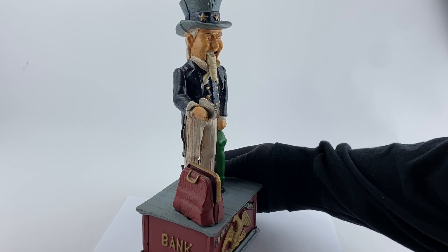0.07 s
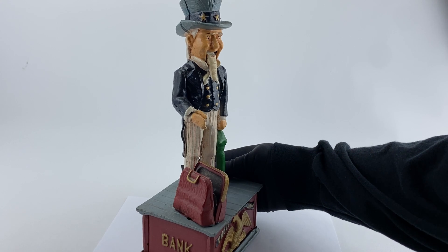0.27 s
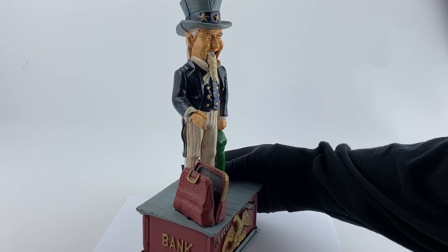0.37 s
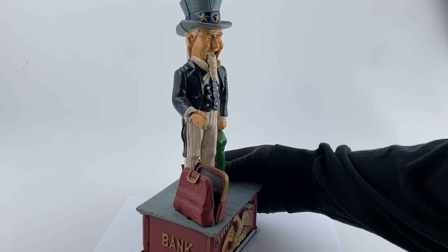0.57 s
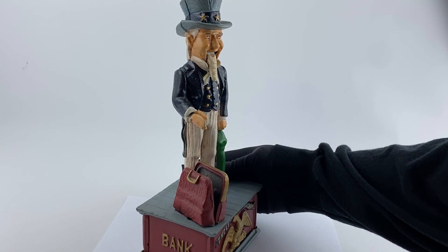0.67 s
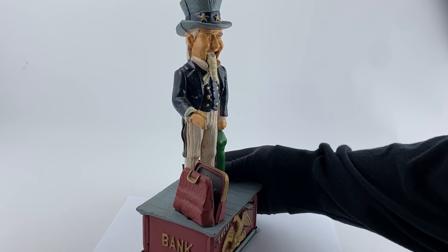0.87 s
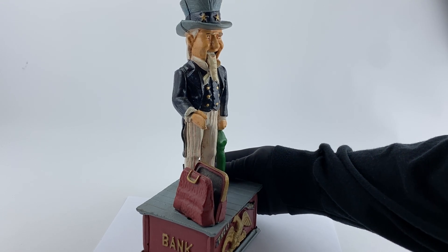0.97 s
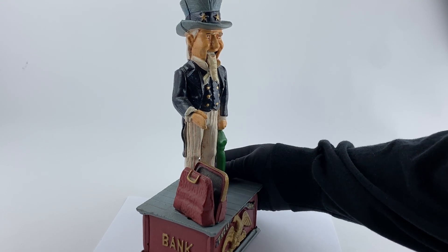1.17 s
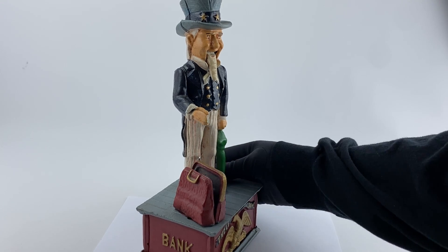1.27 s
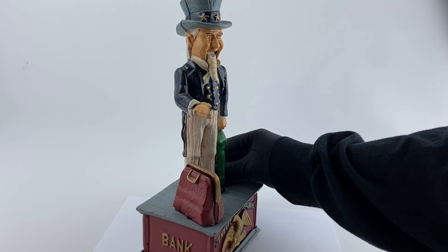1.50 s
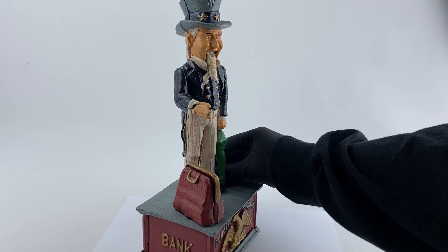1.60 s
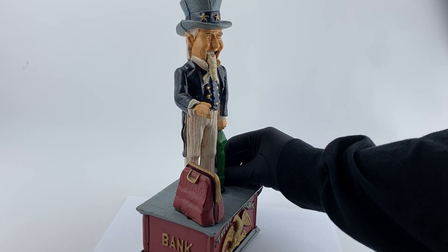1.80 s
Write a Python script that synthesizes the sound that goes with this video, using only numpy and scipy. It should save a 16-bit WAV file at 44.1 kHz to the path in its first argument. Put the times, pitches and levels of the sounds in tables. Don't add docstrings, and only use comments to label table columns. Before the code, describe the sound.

Close stereo sound of an iron coin bank in a quiet, slightly echoing room: scraping lever clatter with a low table boom, bright coin clinks, two hard knocks inside, faint settling, then a duller returning rattle.

```python
import sys
import numpy as np
from scipy import signal
from scipy.fft import rfft, irfft, next_fast_len
from scipy.io import wavfile
from scipy.ndimage import uniform_filter1d, map_coordinates

SR = 44100
rng = np.random.default_rng(int(sys.argv[2]) if len(sys.argv) > 2 else 0)


def generate_wav(signal):
    frames = np.transpose(np.atleast_2d(signal))
    scaled = np.clip(frames, -1, 1) * 32767
    pcm = np.round(scaled).astype(np.int16)
    wavfile.write(sys.argv[1], SR, pcm)


def gain_from_decibels(decibels):
    exponent = np.asarray(decibels, float) / 20
    return 10 ** exponent


N = 81585


def along(points, hz):
    f, v = np.transpose(points)
    return np.interp(np.log(hz + 1), np.log(f + 1), v)


def filtered(x, response):
    n = x.shape[-1]
    m = next_fast_len(n + 8192)
    return irfft(rfft(x, m) * response(np.fft.rfftfreq(m, 1 / SR)), m)[..., :n]


def causal(gain_db):
    cepstrum = irfft(gain_db * np.log(10) / 20)
    half = len(cepstrum) // 2
    folded = np.concatenate([cepstrum[:1], 2 * cepstrum[1:half], np.zeros(len(cepstrum) - half)])
    return np.exp(rfft(folded))


def pair(x, alike):
    def mix(hz):
        turn = np.arccos(np.clip(along(alike, hz), -1, 1)) / 2
        return np.array([np.cos(turn), np.sin(turn)])
    mid, side = filtered(x, mix)
    return np.array([mid + side, mid - side])


def add(out, x, s):
    i = round(s * SR)
    out[..., i:i + x.shape[-1]] += x[..., :out.shape[-1] - i]


def wobble(rate_hz, size):
    return map_coordinates(rng.standard_normal(100), [np.arange(size) * rate_hz / SR])


# (frequency [Hz], level [dB per Hz])
AIR = [(25, -53), (45, -4.5), (90, -10), (150, -10.5), (555, -20.5), (800, -26), (3010, -38.5),
       (15000, -79)]
# (frequency [Hz], likeness [-1 to 1])
AIR_ALIKE = [(60, 0.8), (200, 0.89), (700, 0.06), (2500, 0.09), (7000, 0.2), (9000, 0.92)]
# (frequency [Hz], level [dB])
HUMS = [(56, -48.5), (118, -51.5)]


def air():
    air_db, sway_db = -49, 2.5
    hiss = filtered(pair(rng.standard_normal((2, N)), AIR_ALIKE), lambda hz: gain_from_decibels(along(AIR, hz)))
    hum = np.zeros(N)
    for hz, db in HUMS:
        level = gain_from_decibels(db + sway_db * wobble(19, N))
        cycles = hz * np.arange(N) / SR + 0.33 * wobble(3.5, N)
        hum += level * np.sin(2 * np.pi * cycles)
    return gain_from_decibels(air_db) * hiss / np.sqrt(np.mean(hiss ** 2)) + hum


# (time [s], level [dB], rise [s], swing time [s])
JOLTS = [(0.086, -35, 0.0036, 0.036), (0.212, -7.5, 0.011, 0.05), (0.285, -17, 0.0066, 0.052),
         (0.374, -18, 0.011, 0.027), (0.456, -42.5, 0.012, .05), (.612, -22, 0.0085, 0.039),
         (.665, -35.5, 0.0017, 0.073), (0.817, -38.5, 0.0031, 0.02), (0.874, -37, 0.016, 0.041),
         (1.347, -22.5, 0.011, 0.06), (1.399, -18.5, 0.045, 0.041), (1.444, -19, 0.0062, 0.037),
         (1.479, -23.5, 0.031, 0.034), (1.531, -20.5, 0.019, 0.052), (1.598, -41, 0.0084, 0.075)]
# (frequency [Hz], level [dB], time to fall 60 dB [s])
TABLE_MODES = [(91, -7, 0.069), (243.7, -17.5, 0.26), (419, -21, 0.29), (611, -13, 0.053)]


def table():
    boom_hz, stop_power = 142.9, 1.56
    out, t = np.zeros(N), np.arange(SR // 3) / SR
    for s, db, rise_s, swing_s in JOLTS:
        swell = (1 - np.exp(-t / rise_s)) * np.exp(-(t / swing_s) ** stop_power)
        boom = swell * np.sin(2 * np.pi * boom_hz * t)
        knock = np.zeros(len(t))
        for hz, level, t60 in TABLE_MODES:
            fade = gain_from_decibels(level + rng.normal(0, 1) - 60 * t / t60)
            knock += fade * np.sin(2 * np.pi * hz * rng.normal(1, 0.076) * t)
        add(out, gain_from_decibels(db) * (boom + knock * np.minimum(t / 0.0063, 1)), s)
    return out


# (frequency [Hz], time to fall 60 dB [s])
ROOM = [(150, 0.22), (1000, .4), (3000, 0.33), (8000, 0.32), (15000, 0.12)]
# (frequency [Hz], likeness [-1 to 1])
ROOM_ALIKE = [(150, 0.83), (800, 0.19), (3000, 0.41), (5400, .1), (7800, .995), (8300, 1)]


def room(x):
    room_db, early_db, early_t60_s = -1.5, 10, 0.026
    hz, t, z = signal.stft(rng.standard_normal((2, SR // 3)), SR, nperseg=256)
    late = gain_from_decibels(-60 * t / along(ROOM, hz)[:, None])
    early = gain_from_decibels(early_db - 60 * t / early_t60_s)
    tail = pair(signal.istft(z * (late + early), SR, nperseg=256)[1], ROOM_ALIKE)
    wet = signal.fftconvolve(x[None], tail / np.linalg.norm(tail[0]), axes=1)
    size = wet.shape[1]
    delayed = np.pad(wet, ((0, 0), (40, 0)))[:, :size]
    return np.pad(x, (0, size - len(x))) + gain_from_decibels(room_db) * delayed


def clank(length_s, bright_db, struck_hz, modes, dense, blow_db):
    chatter_t60_s, blow_t60_s, grain_db, mode_scatter_db = 0.015, 0.00017, 4, 2.5
    struck_ring_db, struck_q = 4.5, 13
    struck_db, struck_octaves = 4.5, 0.83
    t = np.arange(8192) / SR
    grains = rng.standard_normal(len(t))
    uneven = gain_from_decibels(grain_db * np.repeat(rng.standard_normal(len(t) // 16), 16))
    chatter = grains * uneven * gain_from_decibels(-60 * np.maximum(t - abs(length_s), 0) / chatter_t60_s)
    drive = chatter + gain_from_decibels(blow_db - 60 * t / blow_t60_s)

    f = np.fft.rfftfreq(2 * len(t), 1 / SR)

    def resonance(hz, width):
        return 1j * f * width / (hz * hz - f * f + 1j * f * width)

    ring = 0
    for k, (hz, width, db) in enumerate(modes):
        ring = ring + (-1) ** k * gain_from_decibels(db + rng.normal(0, mode_scatter_db)) * resonance(hz, width)
    struck = 1 + gain_from_decibels(struck_ring_db) * resonance(struck_hz, struck_hz / struck_q)
    tilt_db = bright_db * np.log2(np.maximum(f, 600) / 3000)
    lift_db = struck_db * np.exp(-(np.log2((f + 1) / struck_hz) / struck_octaves) ** 2)
    body = (ring + causal(along(dense, f))) * struck * causal(tilt_db + lift_db)
    x = irfft(rfft(drive, 2 * len(t)) * body)[:len(t)]
    return x / np.sqrt(np.max(uniform_filter1d(x ** 2, size=128)))


def clanks(contacts, modes, dense, blow_db):
    out = np.zeros((2, N))
    for s, db, *how in contacts:
        add(out, room(gain_from_decibels(db) * clank(*how, modes, dense, blow_db)), s)
    return out


# (time [s], peak level [dB], chatter length [s], brightness [dB per octave],
# pitch of the part struck [Hz])
LEVER = [(.194, -49, 0.01, -8.5, 4740), (.2015, -36, 0.0023, -10, 1110), (.2068, -25, 0.0021, -6, 1050),
         (.2098, -17.5, 0.0015, 1.5, 4370), (.2125, -16.5, 0.0014, 1.5, 1176),
         (.2165, -23.5, 0.0065, -1, 2780), (.2215, -20, 0.0038, 1.5, 635), (.2255, -22, 0.0038, -0.5, 2680),
         (.2305, -26, 0.0026, 4, 4420), (.2345, -17.5, .005, 2, 2450), (.2425, -20.5, 0.0051, -3, 1434),
         (.2465, -17, 0.0016, 5, 3100), (.2505, -19.5, 0.0016, 0.5, 1164), (.2565, -35, 0.0034, -3, 3080),
         (.2635, -22.5, 0.0018, -10.5, 1090), (.273, -41.5, 0.0022, -9.5, 1150),
         (.816, -49, 0.0093, -20, 850), (.823, -53, 0.0025, -18.5, 910), (1.34, -38.5, 0.0046, -1.5, 1105),
         (1.345, -40, 0.0039, -1.5, 4850), (1.351, -28.5, 0.0017, -3, 1050), (1.354, -37, .002, -5, 2130),
         (1.385, -31.5, 0.0017, -7, 925), (1.39, -39, 0.00426, -2.5, 2000), (1.402, -37.5, .002, 4, 11000),
         (1.405, -40, 0.0034, -3.5, 3700), (1.437, -34.5, 0.0035, -6, 2480), (1.445, -32, .004, 0.5, 1800),
         (1.451, -33.5, .004, -2.5, 4040), (1.459, -30, 0.0052, -4, 1424),
         (1.497, -34.5, 0.005, -5.5, 1490), (1.504, -41, 0.0038, -6.5, 2090),
         (1.511, -37.5, 0.0025, -5, 747), (1.531, -42.5, 0.002, -7.5, 883),
         (1.541, -54.5, .004, -15.5, 1377)]
# (frequency [Hz], width [Hz], level [dB])
FIGURE = [(427, 45, 4.5), (635, 12, 4.5), (1050, 160, 5), (1205, 64, 10), (1440, 22, 6), (2050, 58, 9),
          (2605, 56, 3.5), (3193, 260, 8), (3960, 10, -5), (4605, 70, 4.5), (5370, 45, -8),
          (8040, 660, 7.5), (9200, 190, -10), (14500, 270, -11.5)]
# (frequency [Hz], level [dB])
DENSE_FIGURE = [(200, -30.5), (500, -3), (1500, -1), (5000, -1.5), (11000, -3.5), (15500, -4.5)]


def lever():
    return clanks(LEVER, FIGURE, DENSE_FIGURE, blow_db=15.5)


# (time [s], peak level [dB], frequency [Hz], time to fall 60 dB [s])
RODS = [(.211, -25.5, 635, 0.25), (.211, -27.5, 414, 0.11), (0.214, -18, 2605, 0.088),
        (.234, -26, 2605, 0.047), (0.248, -18, 1205, 0.043), (.368, -25.5, 2605, 0.049),
        (.455, -37.5, 5444, 0.11), (0.658, -28.5, 2600, 0.081), (.821, -44.5, 866, 0.056),
        (0.863, -39, 2583, 0.18), (0.86, -47, 4180, .25), (0.908, -45, 2610, 0.18),
        (1.351, -28.5, 975, 0.037), (1.384, -36, 940, .04), (1.459, -35, 1429, 0.23),
        (1.503, -40.5, 2030, 0.066), (1.531, -34, 910, .05)]


def rods():
    rise_s, flutter_db = 0.0017, 2
    out, t = np.zeros((2, N)), np.arange(SR // 4) / SR
    for s, db, hz, t60 in RODS:
        level = gain_from_decibels(db + flutter_db * wobble(88, len(t)) - 60 * t / t60)
        ring = level * np.sin(2 * np.pi * hz * t)
        add(out, room(ring * np.minimum(t / rise_s, 1)), s)
    return out


# (time [s], peak level [dB], chatter length [s], brightness [dB per octave],
# pitch of the part struck [Hz])
COIN = [(.3297, -29.5, 0.004, -3.5, 8000), (.336, -30, 0.0027, -5, 635), (.348, -28, 0.0048, 0, 2950),
        (.361, -32.5, 0.0099, -8, 2770), (.3681, -17.5, 0.00067, -2, 2680), (.37, -14.5, 0.01, -2, 10100),
        (.385, -30, .003, -0.5, 7600), (.393, -32, .004, -7, 2620), (.428, -31.5, 0.0017, 2.5, 5500),
        (.447, -34.5, 0.013, 0, 1140), (.454, -40, 0.013, 2.5, 2700), (.5023, -31, 0.011, 1, 1100),
        (.506, -33.5, 0.01, .5, 14100), (.5372, -41.5, 0.012, -4, 2690), (.6071, -10, 0.00082, 0, 10200),
        (.6105, -9.5, 0.0024, -2, 2010), (.657, -18, 0.00087, 0.5, 1980), (.66, -23, 0.0023, -1.5, 2470),
        (.861, -31, 0.00081, -2, 5330), (.863, -29.5, 0.0022, -2, 2210), (.866, -34, .002, 4, 2600),
        (.905, -37, 0.011, 0, 2420), (.928, -48, 0.0097, 0, 2640), (.945, -50, 0.0029, 0, 2670)]
# (frequency [Hz], width [Hz], level [dB])
BOX = [(1155, 120, -3.5), (1335, 170, -1.5), (1896, 37, -8.5), (2030, 150, -1), (2557, 12, 3.5),
       (3080, 94, 6.5), (4050, 15, 5.5), (5527, 85, 6.5), (7160, 200, -10), (8000, 45, -1),
       (9670, 83, -28.5), (10120, 64, -2.5), (12870, 600, 3.5), (14970, 300, 7.5)]
# (frequency [Hz], level [dB])
DENSE_BOX = [(200, -17), (800, -7), (2000, -2), (6000, -1), (10500, 7), (12200, -11.5), (15500, -15.5)]
# (time [s], level [dB], lift of the highest modes [dB], decay time factor)
RINGS = [(0.337, -36.5, 13, 0.72), (.369, -30, 7, 1), (.387, -23.5, 13, 0.52), (0.446, -34, 3, 0.34),
         (.475, -49, 14.5, 0.94), (.502, -42, 20.5, .4), (.54, -52, -2.5, .9), (.568, -47, 0.5, 1),
         (0.61, -40.5, 2, 0.86), (0.862, -34, -3, 1), (0.906, -44, -18, 0.65)]
# (frequency [Hz], level [dB], time to fall 60 dB [s])
COIN_MODES = [(5440, -14, .08), (9128, -5, .25), (9356, -5, .35), (9394, 0, .4), (13580, -20, .12),
              (15690, 0, .3), (15770, -6, .3)]


def coin():
    tumble_db, tumble_hz, stop_t60_s = 3.5, 70, 0.06
    out, t = np.zeros((2, N)), np.arange(SR // 3) / SR
    next_bounces = [row[0] for row in RINGS[1:]] + [9]
    for (s, db, top_db, slow), next_s in zip(RINGS, next_bounces):
        ring = np.zeros(len(t))
        for hz, level, t60 in COIN_MODES:
            tumble = tumble_db * wobble(tumble_hz, len(t))
            fade = gain_from_decibels(level + top_db * (hz > 15000) + tumble - 60 * t / t60 / slow)
            ring += fade * np.sin(2 * np.pi * (hz * t + rng.random()))
        stopped = gain_from_decibels(db - 60 * np.maximum(t - (next_s - s), 0) / stop_t60_s)
        add(out, room(stopped * ring * np.minimum(t / 0.0015, 1)), s)
    return out + clanks(COIN, BOX, DENSE_BOX, blow_db=22)


def scene():
    return lever() + coin() + table() + air() + rods()


def roll_off(x):
    return signal.sosfilt(signal.butter(12, 16990, fs=SR, output="sos"), x)


# (frequency [Hz], phase [radians])
LEAD = [(300, 0), (700, .7), (1900, -.4), (3000, 1.2), (5600, .9), (8450, -3.14), (12150, -9.42),
        (15800, -15.7)]
# (frequency [Hz], level [dB])
LOUDER = [(60, 0.2), (500, -3.5), (1000, 1.2), (3000, 3), (4900, 3.5), (5400, 16), (6000, 2.5), (8200, 0)]


def record(dry):
    top_hz, low_cut_hz, ceiling = 15900, 45, 0.9

    def ports(hz):
        lead = np.interp(hz, *np.transpose(LEAD))
        left = gain_from_decibels(along(LOUDER, hz) / 2) * np.exp(0.5j * lead)
        treble_cut = gain_from_decibels(-np.maximum(hz - top_hz, 0) / 50)
        bass_cut = (1j * hz / (low_cut_hz + 1j * hz)) ** 2
        return np.array([left, 1 / left]) * treble_cut * bass_cut

    x = filtered(dry, ports)
    x = x / (1 + (x / ceiling) ** 6) ** (1 / 6)
    return roll_off(x)


dry = scene()
out = record(dry)
generate_wav(out)
```